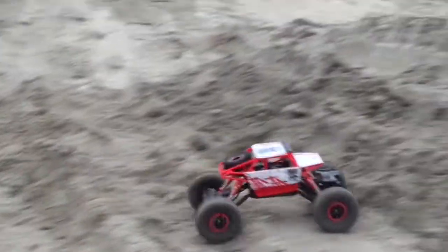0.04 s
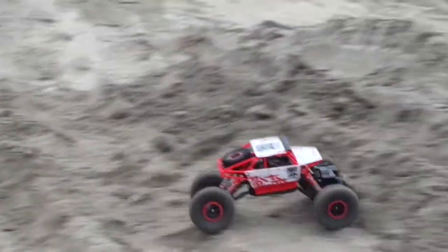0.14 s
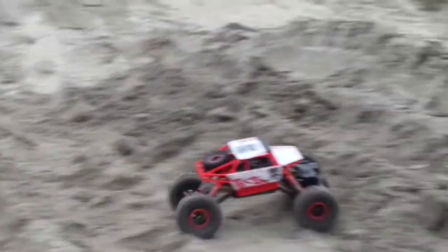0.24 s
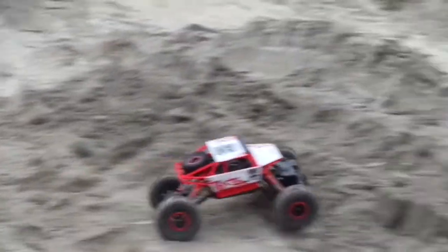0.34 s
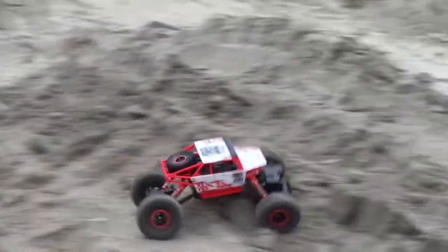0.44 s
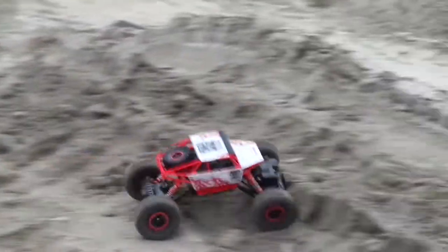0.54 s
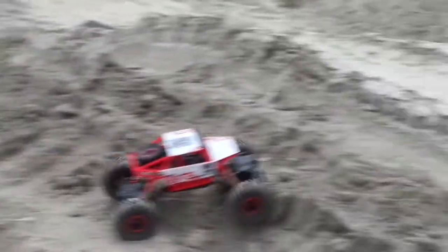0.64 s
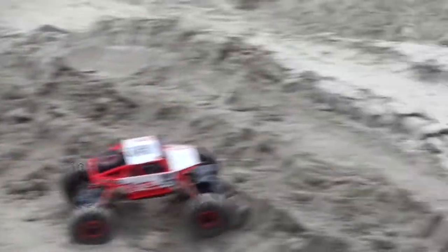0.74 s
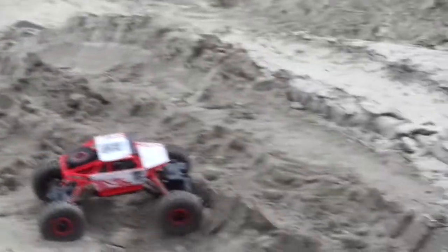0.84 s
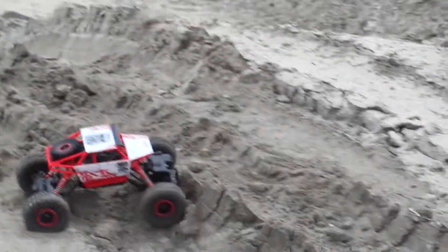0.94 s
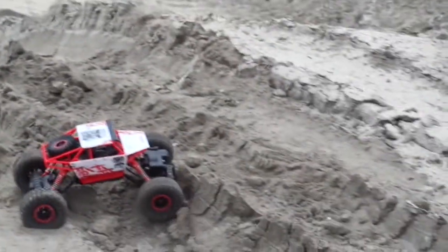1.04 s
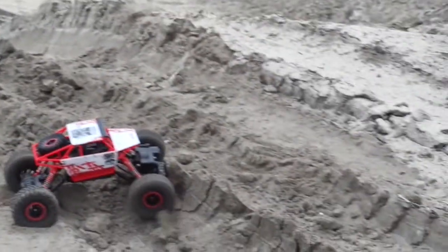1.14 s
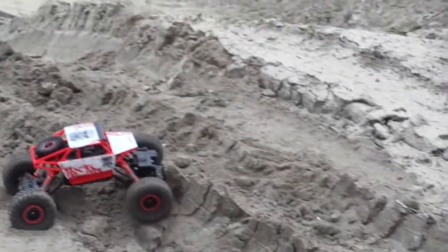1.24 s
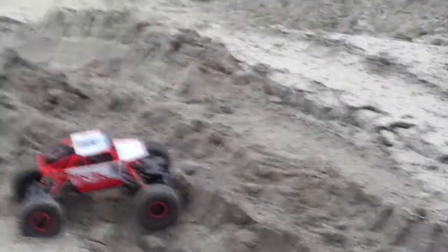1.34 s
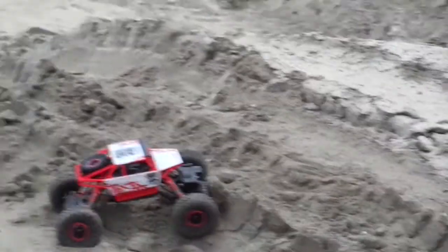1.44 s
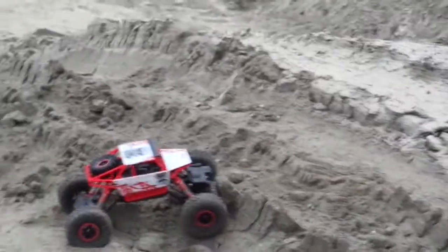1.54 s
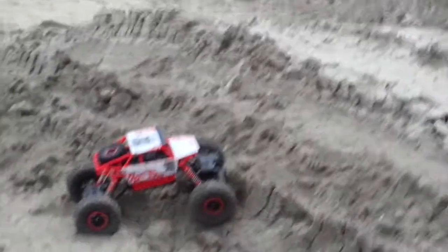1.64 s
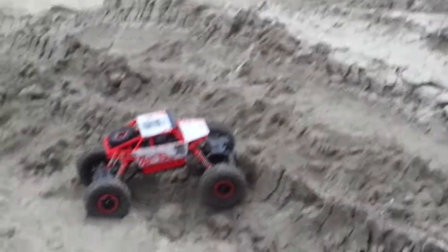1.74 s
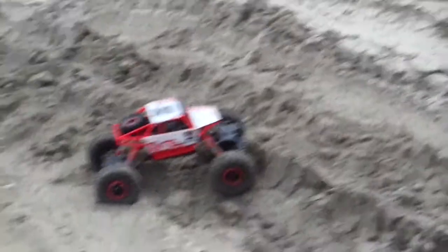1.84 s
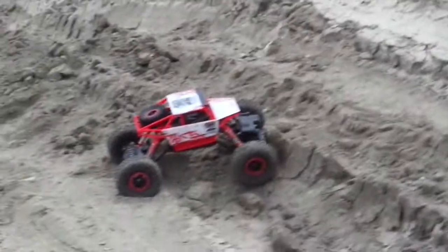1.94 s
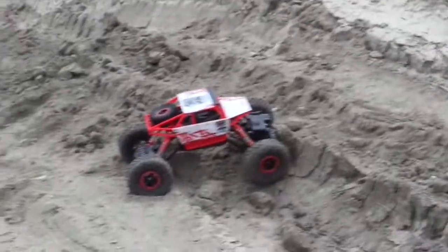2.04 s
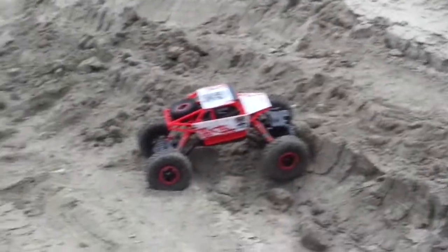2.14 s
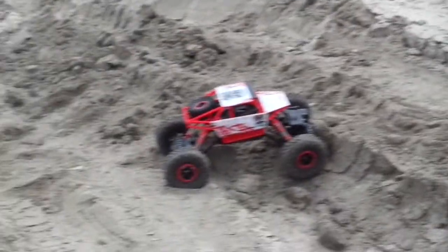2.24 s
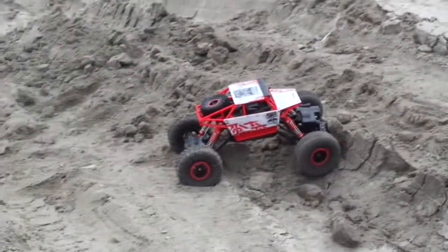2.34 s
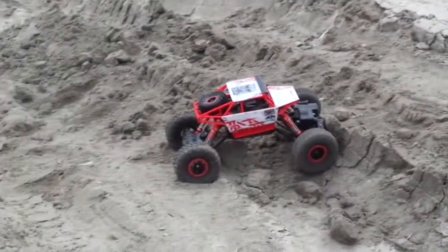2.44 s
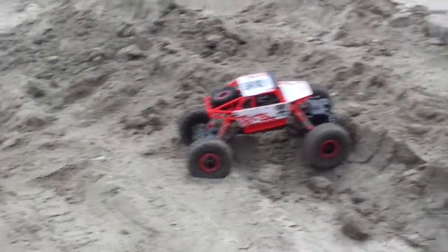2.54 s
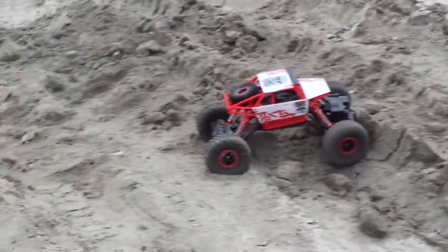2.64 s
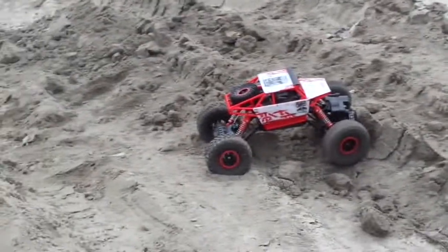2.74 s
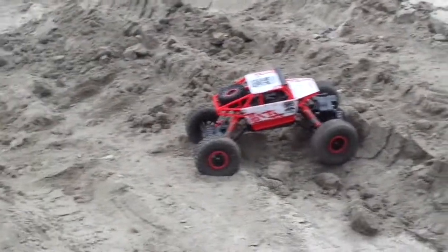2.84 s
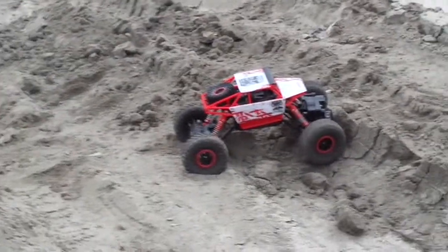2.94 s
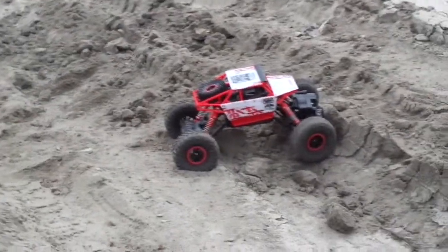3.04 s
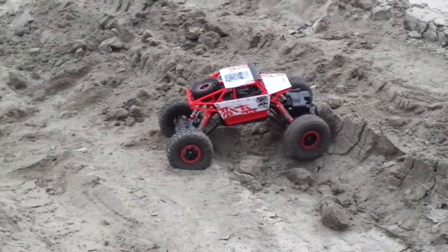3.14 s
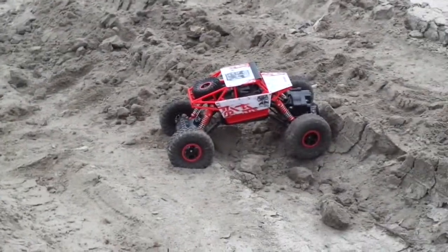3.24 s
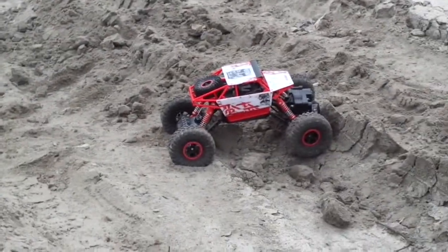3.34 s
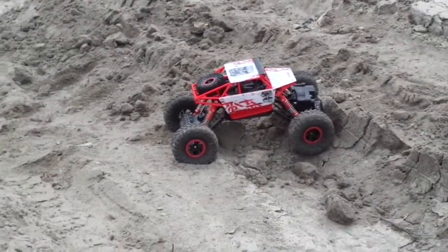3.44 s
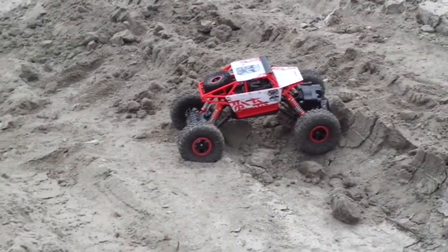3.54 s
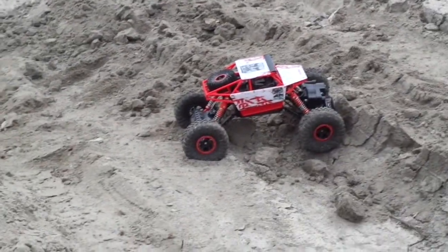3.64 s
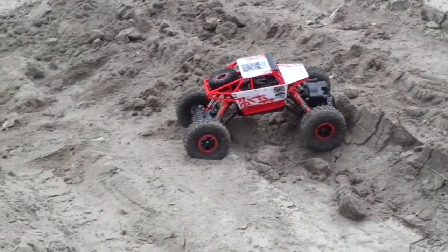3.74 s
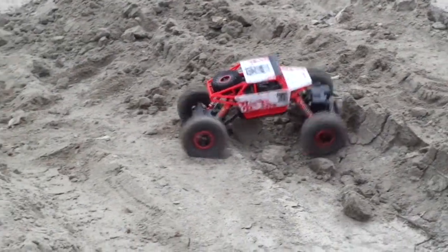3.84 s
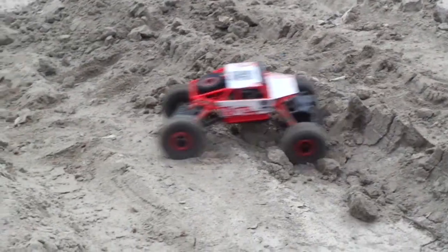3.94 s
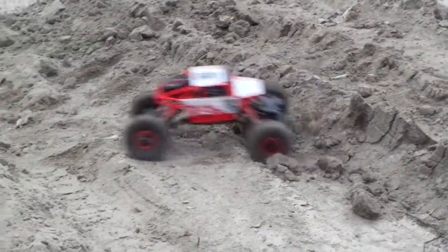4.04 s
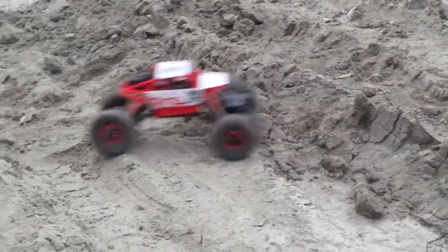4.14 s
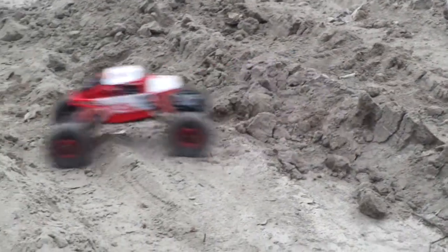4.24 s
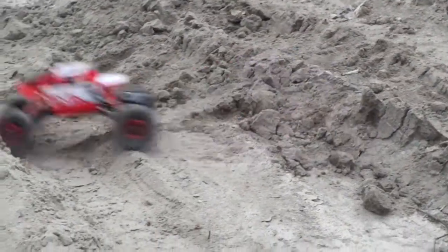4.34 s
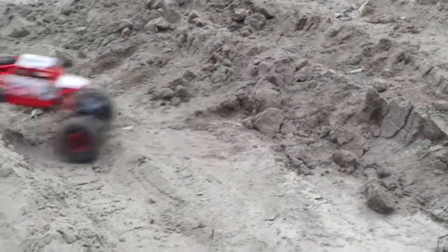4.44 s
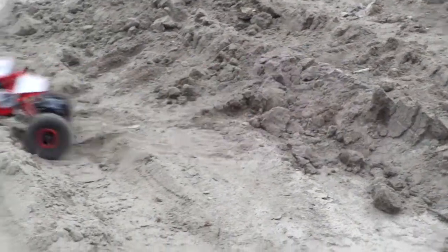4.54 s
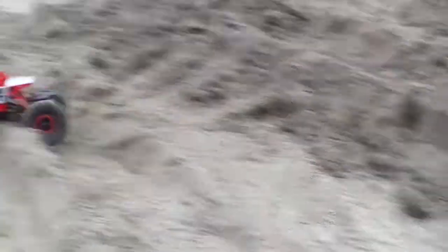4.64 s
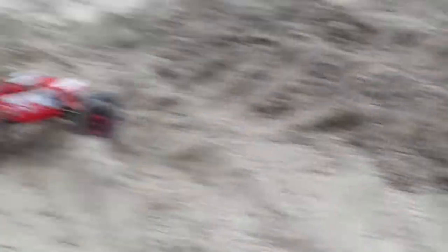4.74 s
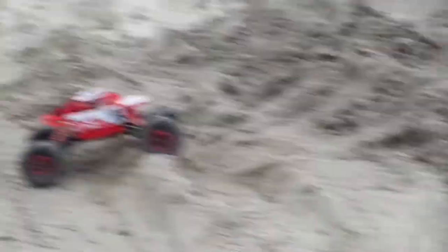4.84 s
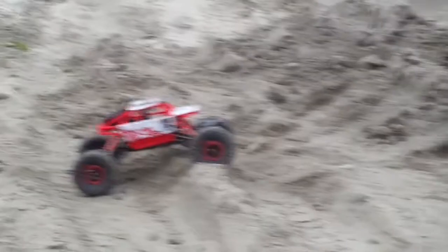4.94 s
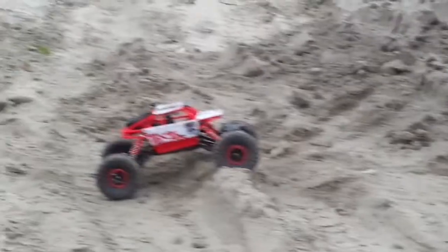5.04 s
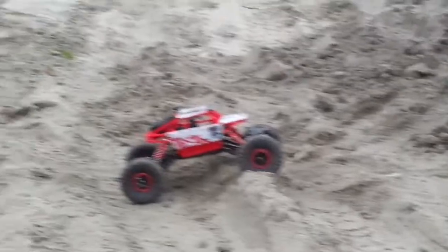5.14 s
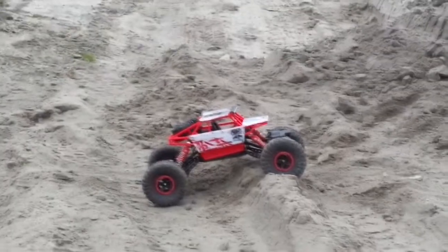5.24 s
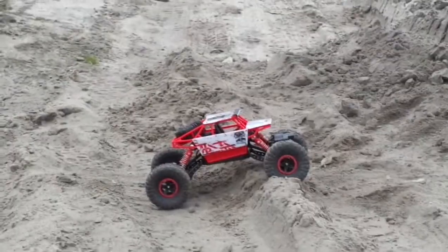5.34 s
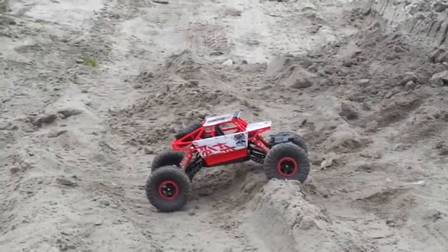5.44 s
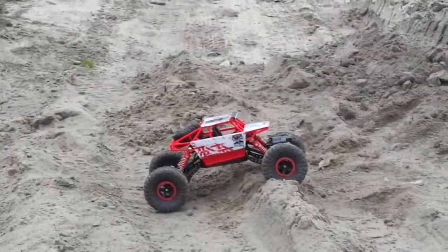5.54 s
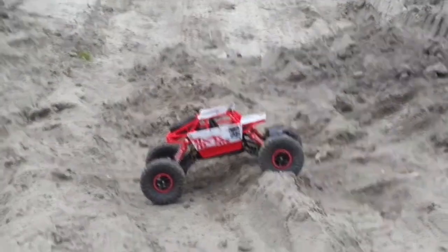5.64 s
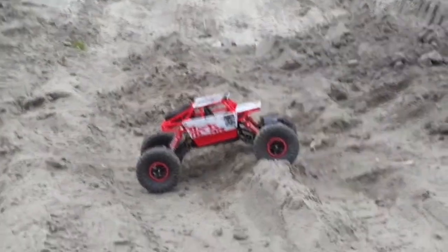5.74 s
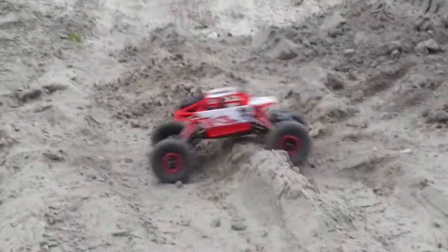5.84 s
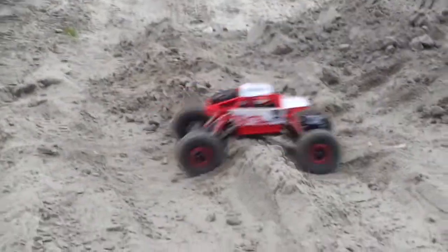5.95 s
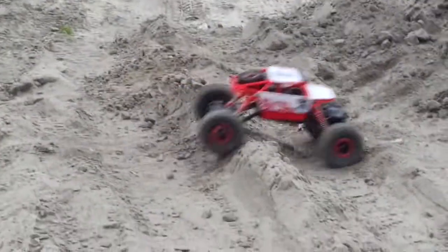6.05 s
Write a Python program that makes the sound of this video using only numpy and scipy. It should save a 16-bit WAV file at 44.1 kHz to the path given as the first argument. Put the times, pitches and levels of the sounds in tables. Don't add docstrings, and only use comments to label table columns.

```python
import sys
import numpy as np
from scipy import signal
from scipy.fft import rfft, irfft
from scipy.io import wavfile
from scipy.ndimage import uniform_filter1d

SR = 44100
rng = np.random.default_rng(int(sys.argv[2]) if len(sys.argv) > 2 else 0)


def log_audio(samples):
    frames = np.atleast_2d(samples).T
    limited = np.clip(frames, -1, 1)
    pcm = np.round(limited * 32767).astype(np.int16)
    wavfile.write(sys.argv[1], SR, pcm)


def invert_db(level):
    return 10 ** (np.asarray(level, dtype=float) / 20)


N = 268768
TEETH = 12


def unit(x):
    return x / np.sqrt(np.mean(x ** 2))


def curve(table):
    s, *columns = np.transpose(table)
    return [np.interp(np.arange(N) / SR, s, c) for c in columns]


def swell(start_s, end_s, fade_s):
    t = np.arange(N) / SR
    return np.clip(np.minimum(t - start_s, end_s - t) / fade_s, 0, 1)


def bursts(table, rise_db_s, fall_db_s):
    t = np.arange(N) / SR
    levels = []
    for start_s, end_s, start_db, end_db in table:
        hold = np.interp(t, [start_s, end_s], [start_db, end_db])
        rise = rise_db_s * np.maximum(start_s - t, 0)
        fall = fall_db_s * np.maximum(t - end_s, 0)
        levels.append(hold - rise - fall)
    return np.array(levels)


def walk(rate_hz):
    k = int(SR / rate_hz)
    steps = np.repeat(rng.standard_normal(N // k + 1), k)
    return unit(uniform_filter1d(uniform_filter1d(steps, k), k)[:N])


def decay(t, t60_s):
    return np.exp(-np.log(1000) * t / t60_s)


def ring(x, hz, width_hz):
    return signal.lfilter(*signal.iirpeak(hz, hz / width_hz, fs=SR), x)


def body(push, modes, teeth=np.zeros(1)):
    noise = rng.standard_normal((len(modes), N))
    out = 0
    for k, (hz, width_hz, db) in enumerate(modes):
        drive = push * (noise[k] + np.roll(teeth, 53 * k))
        rung = ring(ring(drive, hz, width_hz), hz, 2 * width_hz)
        out = out + invert_db(db) * rung / np.sqrt(width_hz / 500)
    return unit(out)


def voiced(rows, third_db):
    s, hz, db, lean_db = np.transpose(rows)
    return np.column_stack([s, hz, db - lean_db, db + lean_db, db + third_db])


def tones(tables, wobble, shake_db, runout):
    hz, *dbs = curve(np.vstack(tables))
    gate = sum(swell(rows[0][0], rows[-1][0], 0.0072) for rows in tables)
    waver = 1 + wobble * (.7 * walk(60) + 1.228 * walk(220))
    phase = 2 * np.pi * np.cumsum(hz * waver) / SR
    phase = phase + runout * np.sin(phase / TEETH)
    lines = (invert_db(db + shake_db * walk(70)) * np.sin((k + 1) * phase) for k, db in enumerate(dbs))
    return np.sqrt(2) * gate * sum(lines)


def tooth_blows(mesh_hz, memory):
    count = np.floor(np.cumsum(mesh_hz) / SR).astype(int)
    fresh = rng.standard_normal((2000, TEETH))
    strength = signal.lfilter([1], [1, -min(memory, .97)], fresh, axis=0).ravel()
    return unit(np.diff(count, prepend=0) * strength[count])


# start and end in seconds, rattle at start and at end in dB.
DRIVE = [(-.1, .51, -44.5, -44.5), (.52, 1.29, -43.5, -41.5), (1.3, 1.33, -41, -47.5),
         (1.38, 1.6, -55, -70), (1.935, 1.99, -51, -55), (2.0, 2.3, -58, -58), (2.31, 2.36, -53, -43.5),
         (2.37, 2.79, -44, -43), (2.8, 3.195, -43.5, -44), (3.42, 3.54, -62.5, -63.5),
         (3.815, 4.395, -45.5, -48.5), (4.4, 4.545, -46, -56.5), (4.56, 4.62, -50.5, -53.5),
         (4.64, 4.69, -56, -62), (5.22, 5.74, -62, -62), (5.755, 5.81, -51, -46), (5.82, 6.2, -45, -47)]
# time in seconds, extra level in dB.
JOLTS = [(.13, -1), (.32, 4.5), (.48, 1), (2.74, 1), (4.05, 6), (4.205, 5), (4.27, -8), (4.35, 3.5)]
# start in
# seconds, change of level in dB.
STARTS = [
    (2.33, -8.5),
    (3.79, -15),
    (4.08, -2.5),
    (4.2, 0.5),
    (4.36, -2),
]
# start and end in seconds, rumble at start and at end in dB.
ROLL_BACK = [
    (1.34, 1.85, -45.5, -52),
]
# level at full drive in dB, growth in dB per dB that the drive falls.
TOP_SHARE = (-4.5, 0.032)
LOW_SHARE = (0, 0.43)
COVER_SHARE = (-3.5, -0.35)


def effort():
    rise_db_s, fall_db_s, rest_db, full_db = 598, 280, -70, -41.5
    jolt_s, warm_s = 0.0091, 0.089
    t = np.arange(N) / SR
    db = np.maximum(bursts(DRIVE, rise_db_s, fall_db_s).max(axis=0), rest_db)
    jolt_db = sum(up_db * np.exp(-((t - s) / jolt_s) ** 2) for s, up_db in JOLTS)
    late_db = sum(back_db * (t > s) * np.exp(-np.abs(t - s) / warm_s) for s, back_db in STARTS)
    late_db = late_db - 14 * swell(*ROLL_BACK[0][:2], 0.039)
    top_db, low_db, cover_db = (
        at_db + growth * (full_db - db) - jolt_db for at_db, growth in (TOP_SHARE, LOW_SHARE, COVER_SHARE))
    rumble_db = bursts(ROLL_BACK, rise_db_s, fall_db_s)[0]
    low_db = np.maximum(low_db, rumble_db - db)
    return db + jolt_db, top_db + 0.48 * late_db + jolt_db, low_db, cover_db + late_db


# pitch in Hz, width in Hz, level in dB.
HOUSING = [(3150, 415, 3), (3814, 760, 3), (3550, 1830, 0.5)]
SHELL = [(6480, 2000, 3.5), (7470, 380, 2), (9300, 1500, 5.5), (10730, 1150, 0)]
CHASSIS = [(506, 86, -3), (850, 307, 5), (1240, 280, -2.5), (1650, 690, 0.5), (2296, 440, 0)]
COVER = [(5395, 990, 3), (12300, 1500, -6)]
# time in seconds, mesh rate in Hz, whine in dB, lean to the second multiple in dB.
CRAWL = [(0, 2152, -53, 4), (.07, 2146, -59, -5), (.15, 2144, -70, 7), (.235, 2100, -60, -4),
         (.255, 1950, -52, -1), (.27, 1842, -50, 1), (.33, 1850, -54, 0), (.36, 1828, -53, -2),
         (.4, 1958, -55, 9), (.46, 2082, -52, 4), (.5, 1746, -55, -8)]
GRIP = [(.58, 2003, -61, -4), (.63, 1867, -49, -2.5), (.7, 1845, -49, 3)]
CLIMB = [(.72, 1599, -55, 7.1), (.8, 1567, -55, 4.6), (.86, 1599, -52, 6.4), (.92, 1555, -53, 5.7),
         (.99, 1598, -49, 5.9), (1.02, 1514, -54.5, 7.1), (1.12, 1491, -55, 7.2), (1.2, 1545, -53.5, 6),
         (1.27, 1544, -54, 5.8), (1.33, 1544, -59, 3.8)]
PUSH = [(2.35, 850, -64, 9), (2.37, 931, -55, 8), (2.39, 1025, -55, 3), (2.41, 1132, -46, -2),
        (2.435, 1195, -47.5, 4.5), (2.48, 1225, -50.5, 4.5), (2.505, 1251, -51, -2.5),
        (2.535, 1273, -54, -1)]
SHOVE = [(2.545, 1378, -62, 5), (2.58, 1404, -55, 3), (2.62, 1462, -52, 2), (2.66, 1558, -53, 5),
         (2.72, 1622, -53, 2), (2.74, 1500, -49, 5), (2.77, 1488, -51, 4), (2.82, 1574, -58, -1),
         (2.95, 1620, -56, 0.5), (3.12, 1717, -53, -2.5), (3.2, 1701, -63, 0)]
REVERSE = [(3.8, 852, -58, -3), (3.815, 980, -54, 0), (3.84, 1174, -52.5, 1.5), (3.855, 1287, -49, -6),
           (3.87, 1362, -59, -3), (3.89, 1437, -55, -8), (3.94, 1441, -55.5, -9), (3.975, 1650, -50, 0),
           (4.01, 1609, -47, 2)]
KICK = [(4.02, 1850, -62, -5), (4.04, 1904, -55, -6), (4.05, 1758, -49, -1), (4.07, 1641, -46.5, 2),
        (4.09, 1621, -62, -7)]
COAST = [(4.16, 2148, -60, -4), (4.18, 2145, -59, -5), (4.205, 1988, -57, -8), (4.225, 1898, -59, -4),
         (4.27, 1951, -72, 1), (4.48, 1917, -64, 1)]
HOP = [(5.775, 931.8, -62, 6), (5.8, 1008, -62, 7), (5.815, 1143, -53, -4), (5.84, 1240, -49.5, -7.5),
       (5.875, 1314, -55, -3)]
LAND = [(5.875, 1328, -57, -1), (5.89, 1412, -59, 2), (5.91, 1500, -53.5, -7), (5.94, 1530, -60, 1),
        (5.965, 1556, -52, -6), (5.995, 1479, -53, -4), (6.01, 1532, -63, -2), (6.05, 1540, -58, -1),
        (6.09, 1533, -66, 1)]
# spurt, third multiple in dB, waver of the rate as a fraction.
VOICES = [(CRAWL, -3, 0.00716), (GRIP, -10, 0.008), (CLIMB, -23, 0.008), (PUSH, -7, 0.0088),
          (SHOVE, -5, 0.00892), (REVERSE, -4, 0.00689), (KICK, -3, 0.00798), (COAST, -7, 0.00811),
          (HOP, -5, 0.00879), (LAND, 2.3, 0.0068)]
# time in seconds, mesh rate in Hz, whine in dB, lean to the second multiple in dB.
REAR = [
    [(0, 2040, -58, 11.5), (.12, 2030, -66, 4), (.15, 2010, -55, 11), (.2, 2064, -64, 8),
     (.26, 2030, -57, 9), (.32, 2020, -57, 8), (.345, 1988, -64, 8), (.36, 1830, -53, 0),
     (.42, 1850, -52, 1), (.45, 1862, -60, 5)],
    [(.84, 1500, -62, 9), (.9, 1518, -59, 11), (.96, 1510, -62, 7)],
    [(1.18, 1628, -61, 2), (1.23, 1590, -55, 7), (1.29, 1642, -57, 7)],
    [(2.6, 1452, -65, 1), (2.65, 1470, -59, 3), (2.72, 1500, -65, 1)],
    [(3.855, 1310, -53, 12), (3.88, 1356, -57, 7), (3.92, 1384, -55, 8), (3.96, 1487, -62, 7)],
    [(5.76, 1481, -64, 5), (5.8, 1550, -61, 2), (5.83, 1730, -62, 3), (5.86, 1731, -63, 4),
     (5.9, 1910, -67, 4.5), (5.94, 1890, -63, 8)],
]


def gears():
    spurts = [voiced(rows, third_db) for rows, third_db, _ in VOICES]
    slip = curve([(rows[k][0], waver) for rows, _, waver in VOICES for k in (0, -1)])[0]
    mesh_hz = curve(np.vstack(spurts))[0]
    front = tooth_blows(mesh_hz * (1 + .006 * walk(50)), .9)
    rear = tooth_blows(mesh_hz * (.9 + .03 * walk(5) + .006 * walk(50)), .9)
    teeth = .95 * (front + rear)
    beat = 1 + 0.095 * np.cos(2 * np.pi * np.cumsum(mesh_hz) / SR / TEETH)
    push = beat * invert_db(0.74 * walk(110) + .5 * walk(8.5))

    db, top_db, low_db, cover_db = effort()
    rattle = body(push, HOUSING, teeth)
    rattle = rattle + invert_db(cover_db + 3.5) * body(push, COVER, teeth)
    rattle = rattle + invert_db(top_db + 1.26) * body(push, SHELL, teeth)
    rattle = rattle + invert_db(low_db - 2.5) * body(push, CHASSIS, .5 * teeth)

    whine = tones(spurts, slip, 1.5, .3)
    whine = whine + tones([voiced(rows, -8) for rows in REAR], 0.0069, 2.5, 0.26)
    faster = [np.array(rows) * [1, 1.05, 1, 1, 1] for rows in spurts]
    strand = tones(faster, 1.6 * slip, 4.5, .5)
    return invert_db(db - 2.5) * rattle + invert_db(-0.5) * whine + invert_db(-17) * strand


# frequency in Hz, density in dB per Hz.
TOWN = [(25, -3), (65, 2), (150, -5), (400, -8.5), (1150, -2.5), (2000, -16), (3300, -21.5), (14800, -23.5)]


def town():
    hz, db = np.transpose(TOWN)
    f = np.maximum(np.fft.rfftfreq(N, 1 / SR), 1)
    colour = rfft(rng.standard_normal(N)) * invert_db(np.interp(np.log(f), np.log(hz), db))
    common, out = walk(0.64), 0
    for octave in np.arange(4, 14.5, .5):
        share = np.clip(1 - 2 * np.abs(np.log2(f) - octave), 0, 1)
        own_db = 2.3 * min(1, 11.4 / octave) ** 4 * walk(6.8)
        out = out + invert_db(0.25 * common + own_db) * irfft(colour * share, N)
    return invert_db(-52) * unit(out)


# start and end in seconds, level at start and at end in dB, upper share in dB.
GUSTS = [(0.1, 0.203, -43, -49, -3), (0.228, 0.37, -40, -37, -15), (0.522, 0.662, -44, -35.5, -9),
         (0.698, 0.903, -37, -35.5, -5.5), (1.076, 1.13, -34.5, -31, -12), (1.204, 1.237, -33.5, -35, -6.5),
         (1.315, 1.336, -32, -29, 2.5), (1.358, 1.442, -33.5, -45, 4.5), (1.508, 1.548, -41, -36, -5),
         (1.565, 1.71, -38.5, -47.5, -4.5), (1.844, 2.353, -44, -44.5, -12),
         (2.381, 2.503, -37.5, -46, -25), (2.58, 2.937, -41, -49.5, -9.5), (2.977, 3.03, -43, -47, -24),
         (3.177, 3.251, -42.5, -45.5, -12), (3.298, 3.549, -57, -58.5, 5), (3.796, 3.924, -52.5, -52, -1)]
# time in seconds, peak in dB, pitch in Hz, overtones in dB.
THUMPS = [(0.099, -30, 91, -14), (0.264, -27, 96.9, -17), (0.331, -19, 136, -5), (0.385, -25, 107, -7),
          (0.551, -20, 133, -27), (0.6, -26.5, 153, -1.5), (0.65, -28.5, 126, -8), (.72, -25, 140, -6),
          (0.751, -29, 168, -9), (0.774, -21, 192, -26), (0.819, -19.5, 182, -28), (0.874, -19, 161, -11),
          (.845, -24, 189.6, -18), (.895, -25, 229, -14), (0.968, -31, 219.7, -3), (1.015, -35, 169.8, -9),
          (1.071, -14.5, 221.5, -10.5), (1.098, -18, 231, -14.5), (1.12, -29, 199.6, -11),
          (1.144, -26, 171, -17), (1.201, -23, 91.9, -2), (1.228, -16, 187, -9), (1.29, -26, 109, -10),
          (1.312, -10.5, 178.8, -7.5), (1.323, -16, 211.4, -3), (1.333, -18, 150.5, -14),
          (1.364, -21, 163, -1.5), (1.377, -30, 200, -8), (1.398, -22.5, 112, -5), (1.432, -28, 150, -12),
          (1.46, -31, 110.4, -10), (1.5, -17, 119, -1.5), (1.513, -11, 168, -5), (1.522, -14, 131, -4),
          (1.538, -14, 141, -6.5), (1.56, -32, 149, -3), (1.787, -31, 127.8, -4), (2.105, -24, 160.2, -9),
          (2.187, -29, 130.6, -18), (2.236, -32, 139, -9), (2.274, -28, 160, -7), (2.99, -25, 128.4, -6.5),
          (3.211, -26.5, 153.3, -10)]


def wind():
    calm_db, calm_share_db, eddy_s = -64.5, 8, 0.0192
    each_db = bursts(np.array(GUSTS)[:, :-1], 240, 232)
    db = np.maximum(each_db.max(axis=0), calm_db)
    gust_share_db = np.transpose(GUSTS)[-1][each_db.argmax(axis=0)]
    upper_db = uniform_filter1d(np.where(db > calm_db, gust_share_db, calm_share_db), size=900)
    flutter = invert_db(1.5 * walk(30) + 3.0 * walk(70))
    low = body(flutter, [(73.0, 65, -2.0), (138.0, 68, -4.5)])
    upper = body(flutter, [(240, 134, -3.0), (390.0, 510, -11.0)])
    out = invert_db(db - 3) * (low + invert_db(upper_db - 5.0) * upper)

    u = np.linspace(0, 1, int(eddy_s * SR))
    for (s, peak_db, hz, sharp_db), (start, bend) in zip(THUMPS, rng.random((len(THUMPS), 2))):
        phase = 2 * np.pi * (start + hz * eddy_s * u * (1 + 0.24 * (bend - .5) * u))
        sharp = np.cos(1.661 * phase) + 0.25 * np.sin(2.42 * phase) + 0.14 * np.cos(3.31 * phase)
        eddy = np.sin(phase) + invert_db(sharp_db) * sharp
        first = int((s - .003) * SR)
        out[first:first + len(u)] += invert_db(peak_db - 7.5) * np.sin(np.pi * u ** 1.47) * eddy
    return out


# start and end in seconds, level in dB.
SPLIT = [(0.122, 0.257, -56.5), (0.936, 1.023, -52.5), (1.239, 1.328, -52.5), (1.394, 1.468, -69),
         (1.49, 1.552, -64), (1.607, 1.634, -62), (1.986, 2.028, -60), (2.33, 2.368, -70),
         (2.598, 2.645, -55), (2.698, 2.8, -56.5), (3.002, 3.054, -56), (3.199, 3.256, -60),
         (3.339, 3.4, -71), (3.566, 3.602, -64), (3.809, 3.835, -69), (4.018, 4.125, -60),
         (4.264, 4.315, -60), (4.361, 4.393, -55), (4.45, 4.527, -63), (4.6, 4.737, -70),
         (5.771, 5.784, -81.7), (5.86, 5.905, -71), (5.987, 6.096, -59)]


def track_grain():
    gate = sum(invert_db(db) * swell(start_s, end_s, 0.033) for start_s, end_s, db in SPLIT)
    modes = [(90, 110, -10), (397, 1400, 0.0), (1500, 2600, 0), (4400, 4000, 4), (10000, 4200, 0.0)]
    return gate * body(1, modes)


# time in seconds, pitch in Hz, level in dB, lean to the second multiple in dB.
SING = [
    [(0.22, 593, -59, 8), (.265, 570, -56.5, 7), (0.32, 611, -48.5, 0), (0.42, 642, -66, -7)],
    [(0.44, 691.5, -72, -5), (0.476, 680, -55, -9), (0.494, 682, -55, -10), (0.52, 687, -50, -12)],
    [(0.52, 684, -52, -13), (.57, 678, -43.5, -1), (0.68, 660, -46.5, 5.5), (.78, 668, -44.5, 5),
     (1.01, 647.4, -47.5, 6), (1.08, 655.7, -47.5, 4.5), (1.13, 650, -49, 6.5), (1.19, 633.5, -50, 7)],
    [(1.19, 640.7, -46, -2), (1.225, 627.3, -49, 4), (1.25, 613, -53, 0), (1.29, 600, -56, 8),
     (1.315, 578, -54, 6), (1.345, 540, -56, 5)],
]


def singing():
    return tones([voiced(rows, -7.5) for rows in SING], 0.0032, 0.86, 0.069)


# time in seconds, peak in dB, pitch in Hz.
SQUEAKS = [(.25, -36, 4100), (0.307, -39, 4020), (0.312, -37, 3750), (0.471, -35, 3670), (.478, -42, 3440),
           (.545, -50, 3650), (0.556, -38, 3335), (2.61, -44, 3780), (3.182, -40, 1194), (3.975, -40, 3256),
           (4.03, -40.5, 850), (4.287, -46, 2337), (4.342, -41, 2279), (4.659, -50.5, 3245),
           (5.422, -58, 3640)]


def squeaks():
    squeak_s, out = 0.02, np.zeros(N)
    u = np.linspace(0, 1, int(squeak_s * SR))
    for s, db, hz in SQUEAKS:
        phase = 2 * np.pi * hz * squeak_s * u * (1.03 - 0.036 * u)
        first = int(s * SR)
        out[first:first + len(u)] += invert_db(db) * np.sin(np.pi * u) ** 2 * np.sin(phase)
    return out


# time in seconds, peak in dB, pitch in Hz.
TICKS = [(0.4798, -36, 3560), (0.5968, -42, 3300), (1.505, -45, 3350), (1.739, -46.5, 3456),
         (1.8376, -51, 2560), (1.937, -43, 8700), (1.943, -48, 12520), (1.957, -43, 9000),
         (1.95, -46, 3900), (1.9578, -40, 1730), (1.989, -42, 3230), (3.469, -47, 2700), (3.481, -45, 3200),
         (3.531, -58, 3110), (3.545, -53, 3895), (3.557, -53, 3895), (3.626, -49, 2104), (3.675, -42, 1850),
         (3.704, -44, 2092), (3.788, -53, 3495), (3.8135, -46, 3810), (4.0354, -43, 5007),
         (4.345, -36, 4783), (4.5799, -54, 3424), (4.606, -47, 5330), (5.019, -52, 3300),
         (5.2193, -54, 4030), (5.249, -47, 3296), (5.56, -49, 3780), (5.721, -47.5, 3500),
         (5.721, -54, 6600)]


def ticks():
    size = 4096
    out, t = np.zeros(N + size), np.arange(size) / SR
    fade = decay(t, 0.046) * np.clip(t / 0.0011, 0, 1)
    for (s, db, hz), noise in zip(TICKS, rng.standard_normal((len(TICKS), size))):
        pitched = unit(ring(noise, hz, 0.12 * hz))
        crack = decay(t, 0.029) * unit(ring(ring(noise, 5896, 7200), 4397, 11000))
        tick = pitched + 1.3 * min(hz / 3300, 1) ** 3 * crack
        first = int((s - .0015) * SR)
        out[first:first + size] += invert_db(db - 4.5) * fade * tick
    return out[:N]


# time in seconds, peak in dB, pitch in Hz.
SNAPS = [(1.078, -31, 330.4), (1.317, -22, 260.7), (1.327, -19.5, 343), (1.336, -25, 300),
         (1.366, -31, 280), (1.376, -30, 358), (1.401, -31, 360), (1.507, -27, 286), (1.518, -30, 260),
         (1.531, -14.5, 268), (1.545, -28, 380), (1.563, -30, 240)]


def snaps():
    cycles, out = 1.87, np.zeros(N)
    for (s, db, hz), start in zip(SNAPS, rng.random(len(SNAPS))):
        u = np.linspace(-.5, .5, int(cycles / hz * SR))
        flick = np.cos(np.pi * u) ** 2 * np.sin(2 * np.pi * (start + cycles * u))
        first = int(s * SR) - len(u) // 2
        out[first:first + len(u)] += invert_db(db) * flick
    return out


# start and end in seconds, level at start and at end in dB.
FREEWHEEL = [
    (1.3, 1.62, -49.5, -61),
    (1.82, 2.0, -66, -55),
    (3.2, 3.27, -57, -60),
]
# pitch in Hz, width in Hz, level in dB.
AXLE = [(1850, 160, 0), (2530, 300, -6), (3250, 440, -3)]
# start and end in seconds, level at start and at end in dB.
CREEP = [
    (5.24, 5.73, -66, -65),
]
# pitch in Hz, width in Hz, level in dB.
SERVO = [(4477, 540, 1), (10500, 590, -1), (7930, 495, -6)]


def rubbing():
    drag = invert_db(1.6 * walk(45.2))
    out = 0
    for rows, modes in ((FREEWHEEL, AXLE), (CREEP, SERVO)):
        out = out + invert_db(bursts(rows, 400, 250).max(axis=0)) * body(drag, modes)
    return out


# start and end in seconds, level at start and at end in dB.
STEER = [
    (2.04, 2.31, -57, -54.5),
    (5.3, 5.7, -69, -69),
]


def steering():
    clicks = (rng.random(N) < 600 / SR) * invert_db(2 * walk(60))
    turns = np.cumsum(73.6 * (1 + .05 * walk(30))) / SR
    knock = np.exp(-(turns % 1) / .25) * invert_db(2.5 * walk(25))
    push = knock * (clicks + 0.08) + 0.024
    shell = [(7800, 670, -3.5), (6900, 690, -6), (3300, 1200, -4.0), (10910, 700, -18)]
    return invert_db(bursts(STEER, 800, 1216).max(axis=0)) * body(push, shell)


def dirt_bank(car):
    t = np.arange(6000) / SR
    tail = ring(rng.standard_normal(len(t)), 3500, 1600) * decay(t, 0.48)
    return invert_db(-57) * signal.fftconvolve(car, tail)[:N]


def scene():
    car = gears() + singing() + squeaks() + ticks() + rubbing() + steering()
    mono = car + dirt_bank(car) + town() + wind() + snaps()
    return np.array([mono, mono])


def top_cut(x):
    return signal.sosfilt(signal.butter(12, 14980, fs=SR, output="sos"), x)


def record(dry):
    grain = track_grain()
    top = signal.ellip(8, .1, 60, 14950, fs=SR, output="sos")
    mix = signal.sosfilt(top, dry + np.array([grain, -grain]))
    return top_cut(mix)


dry = scene()
out = record(dry)
log_audio(out)
```